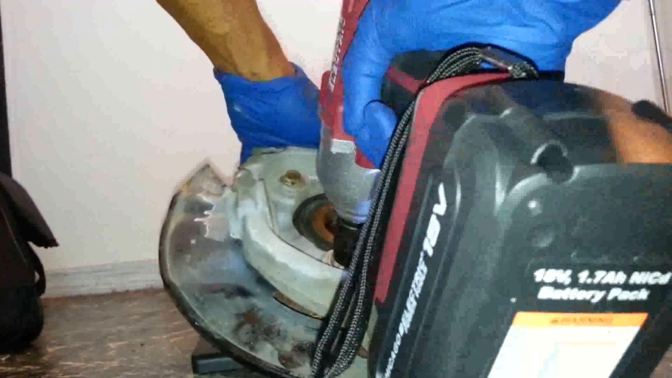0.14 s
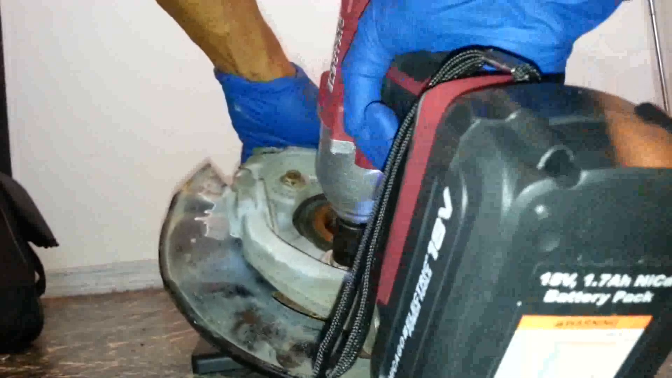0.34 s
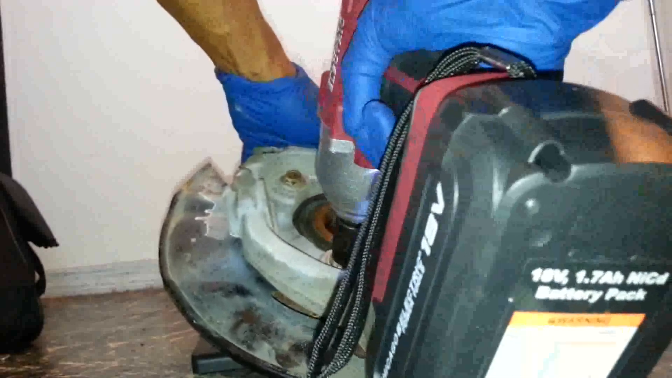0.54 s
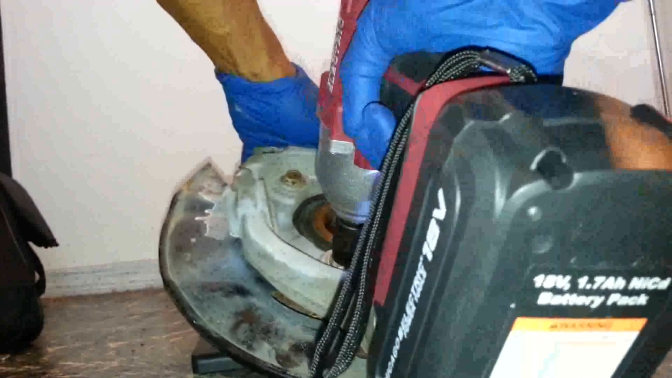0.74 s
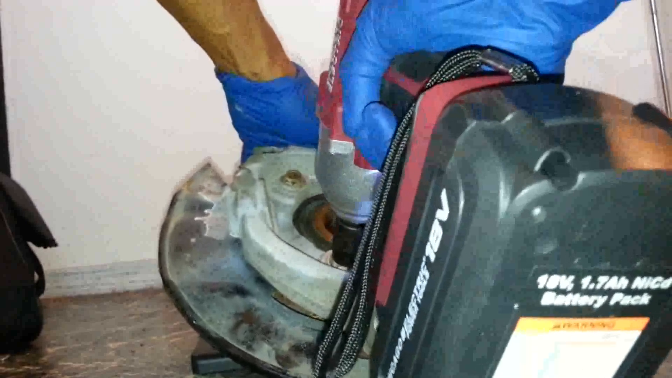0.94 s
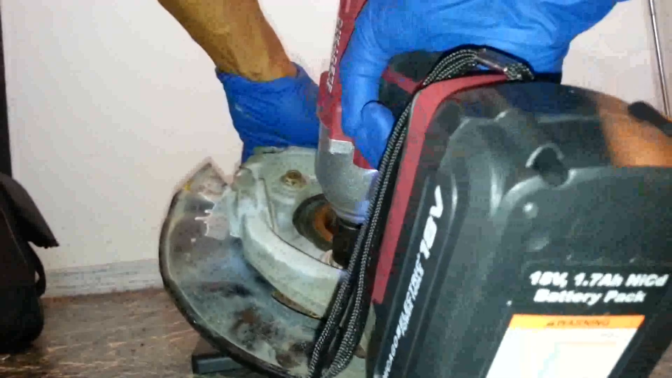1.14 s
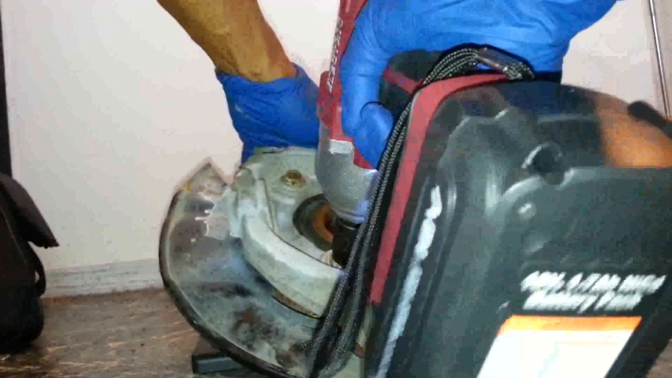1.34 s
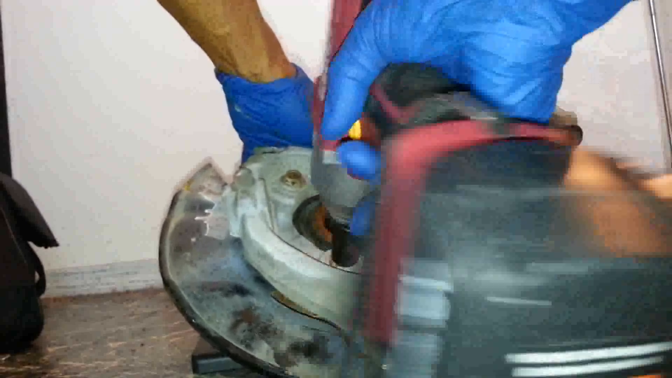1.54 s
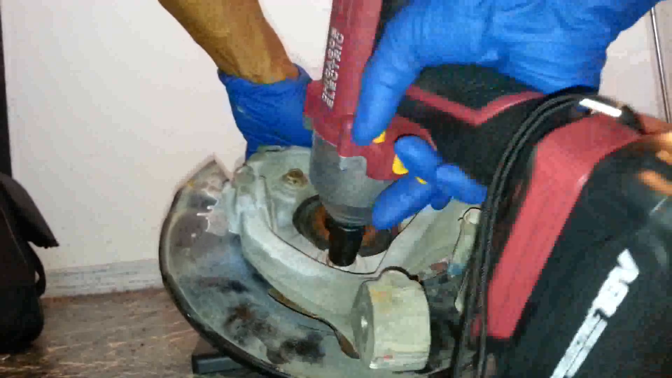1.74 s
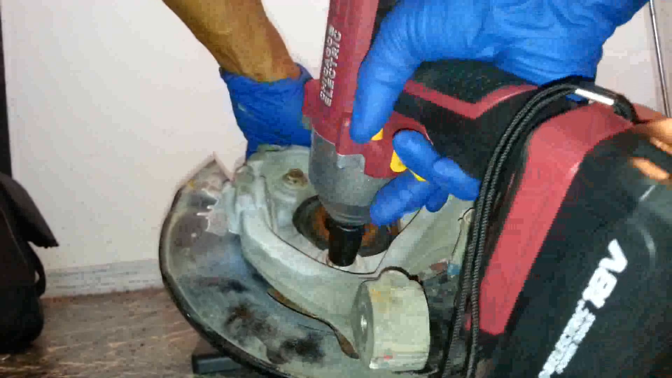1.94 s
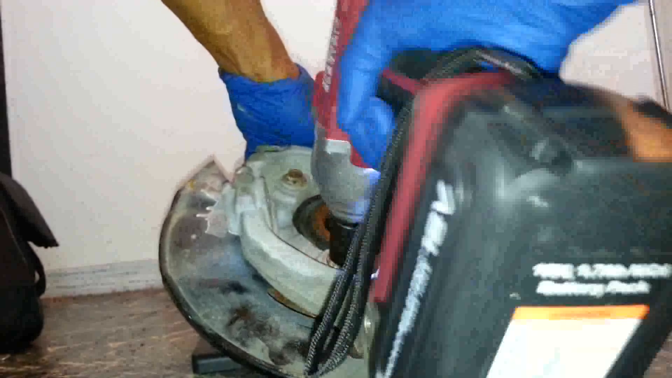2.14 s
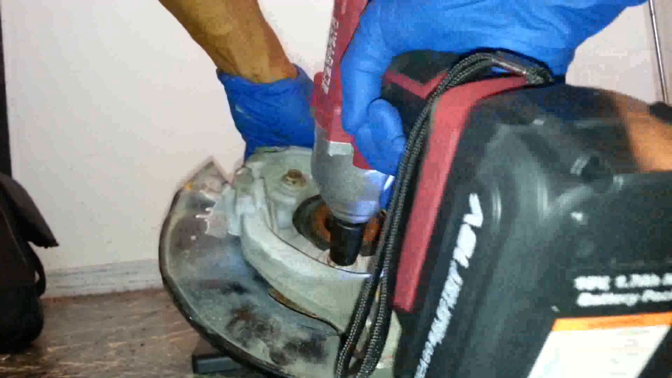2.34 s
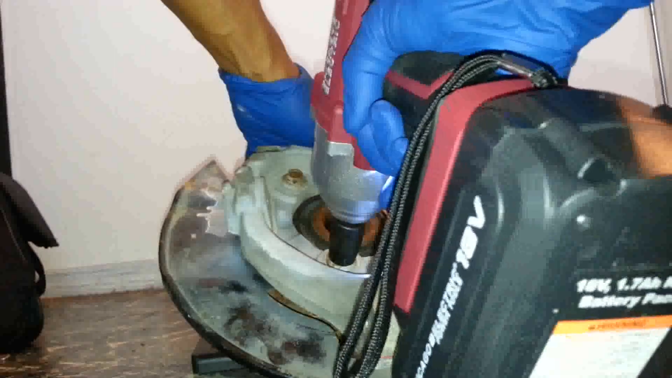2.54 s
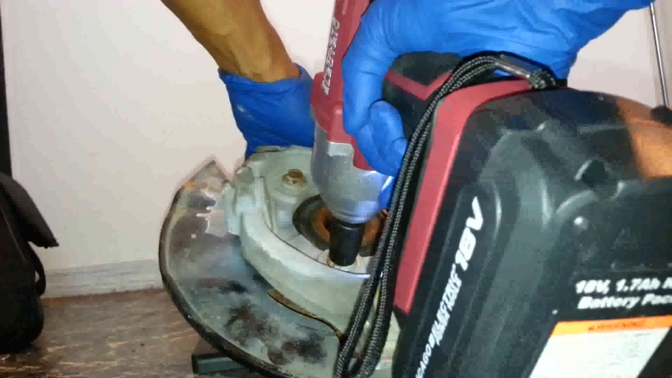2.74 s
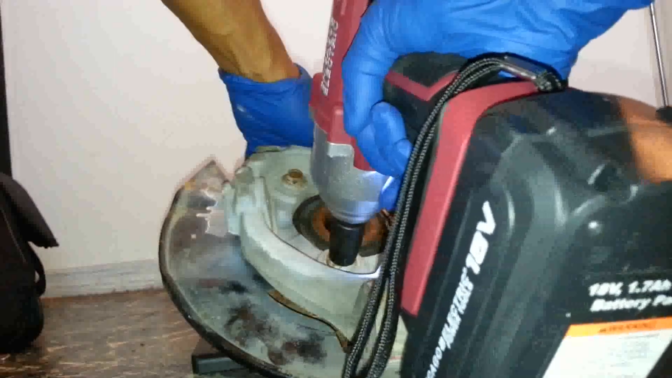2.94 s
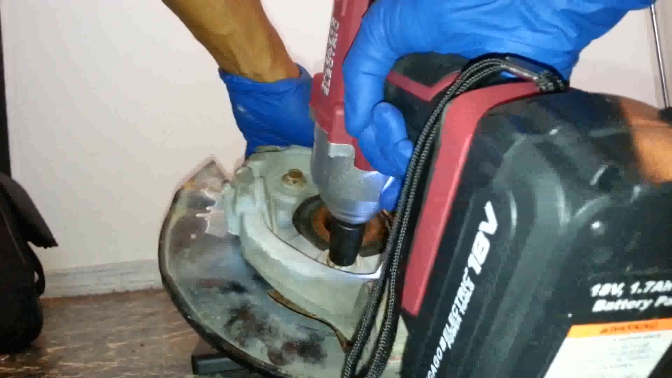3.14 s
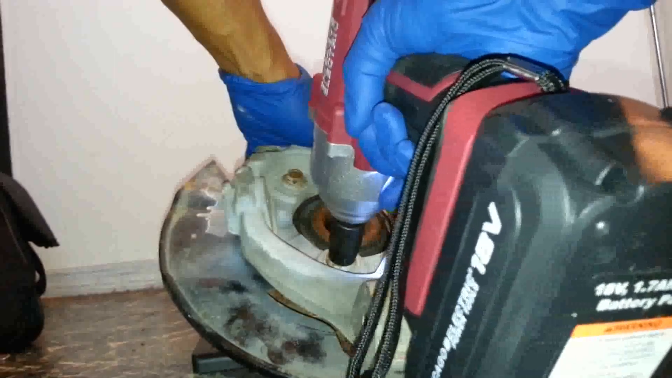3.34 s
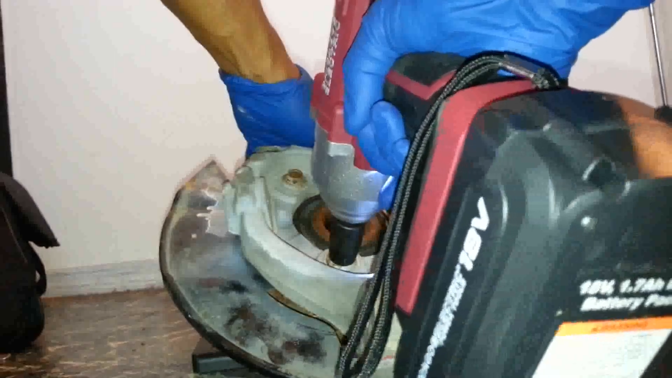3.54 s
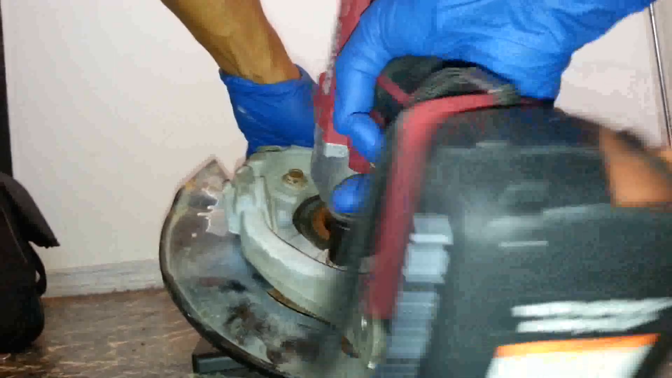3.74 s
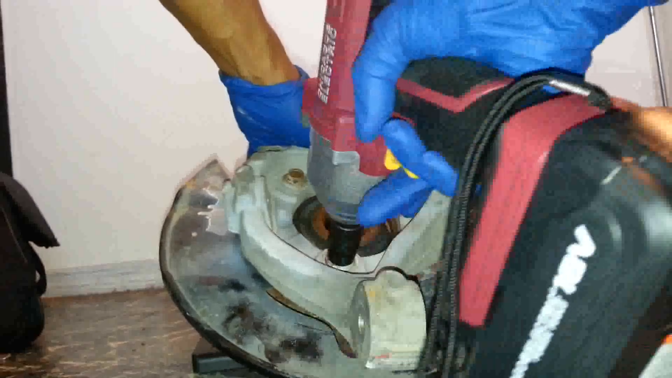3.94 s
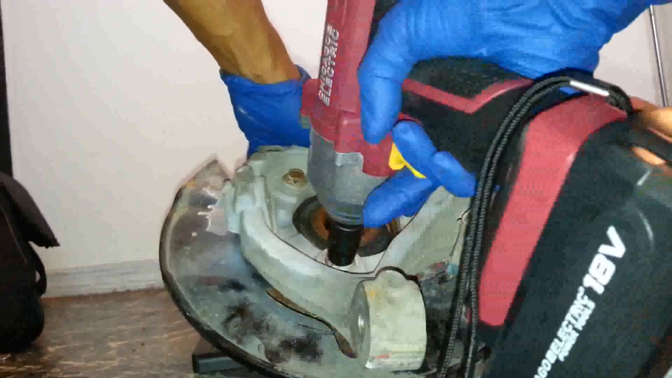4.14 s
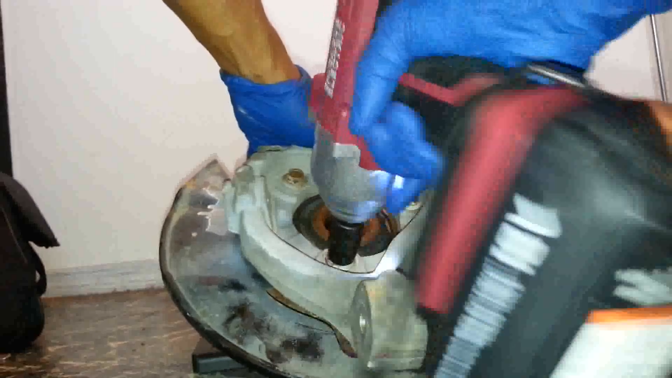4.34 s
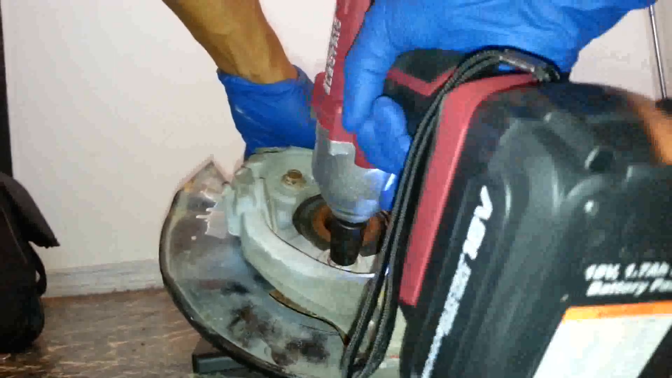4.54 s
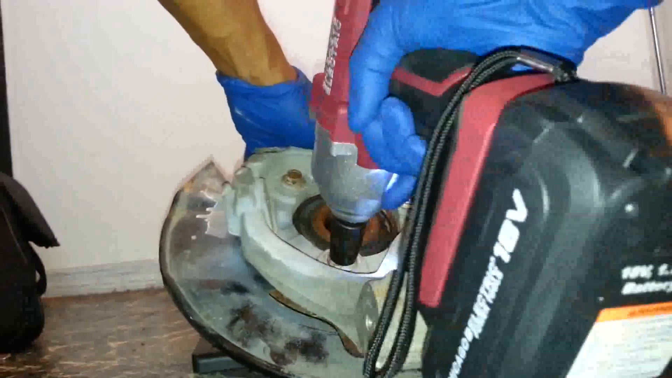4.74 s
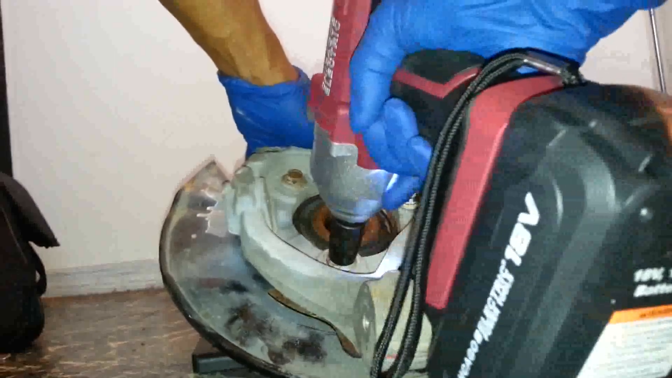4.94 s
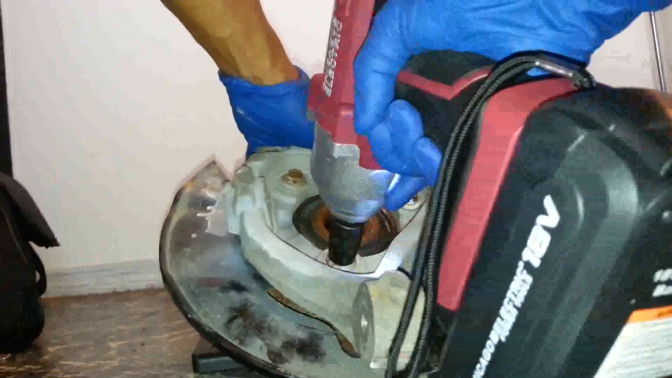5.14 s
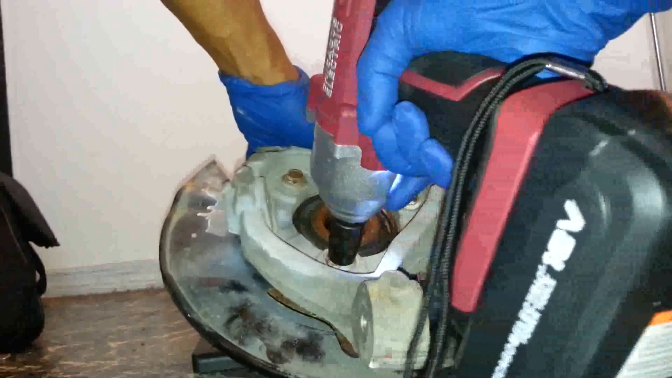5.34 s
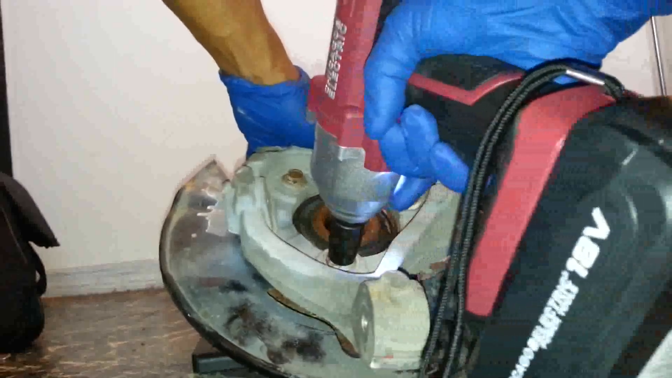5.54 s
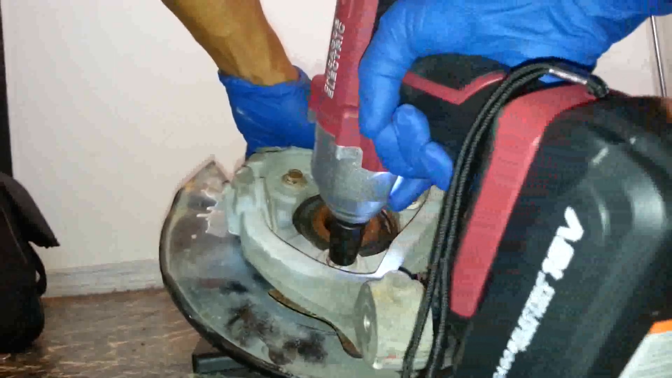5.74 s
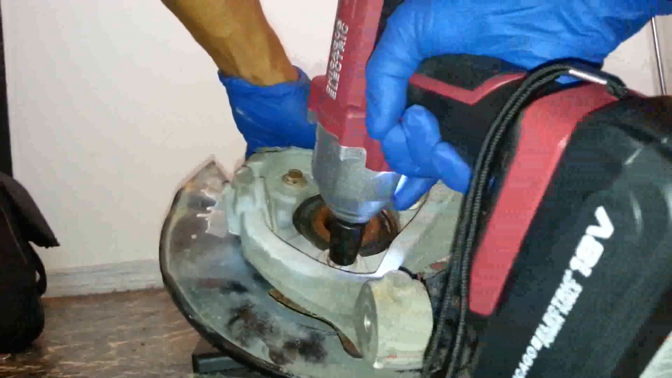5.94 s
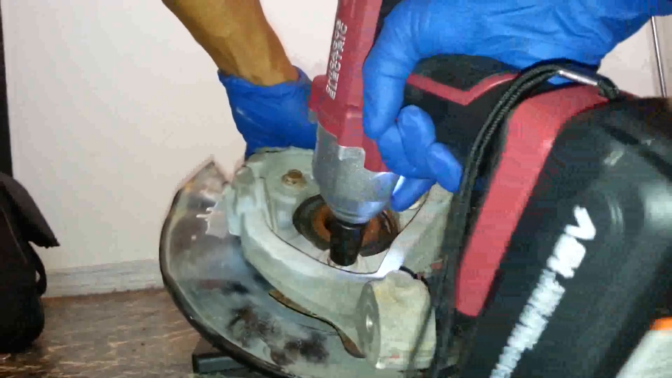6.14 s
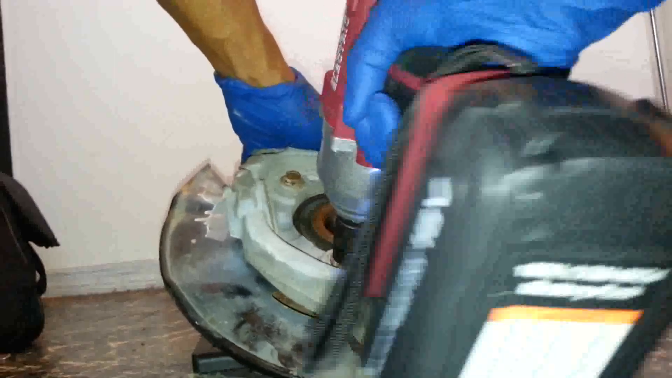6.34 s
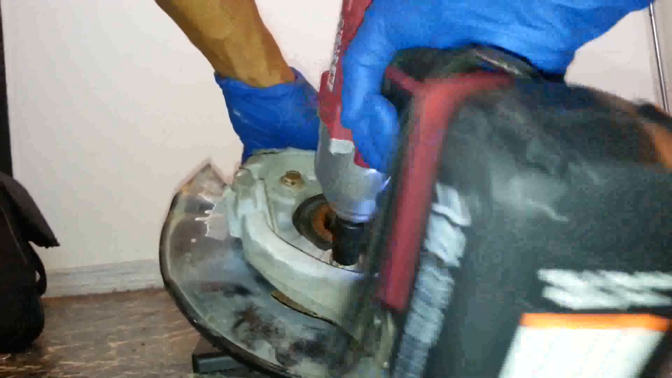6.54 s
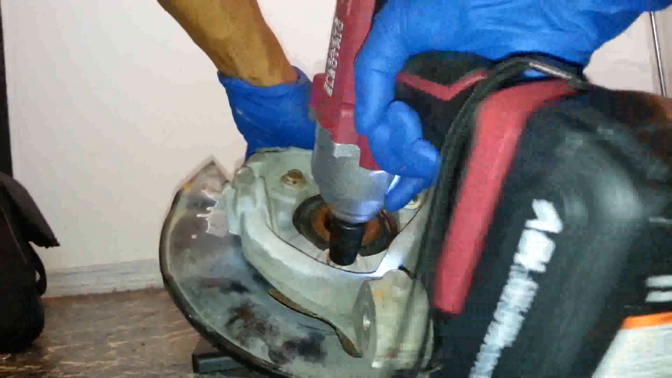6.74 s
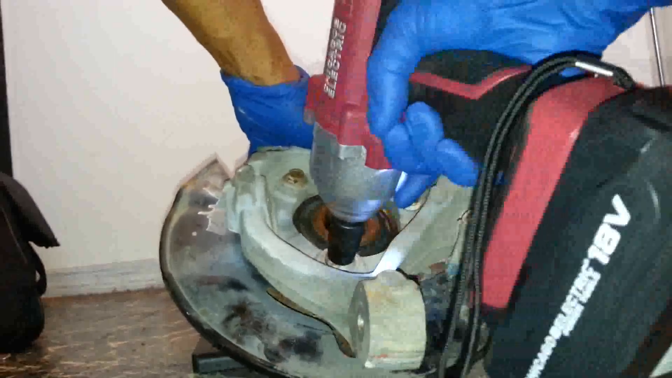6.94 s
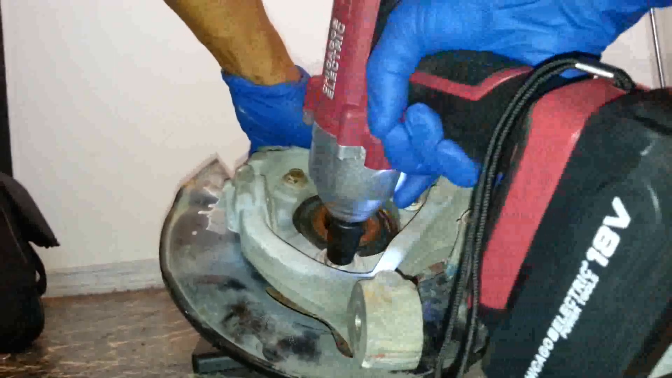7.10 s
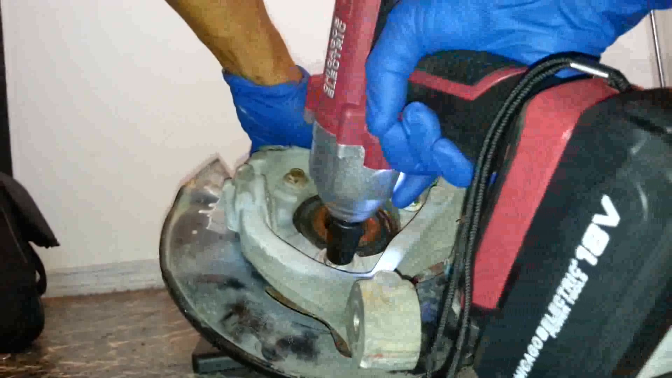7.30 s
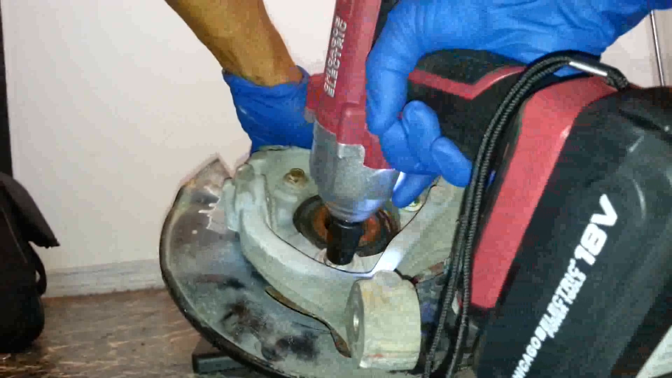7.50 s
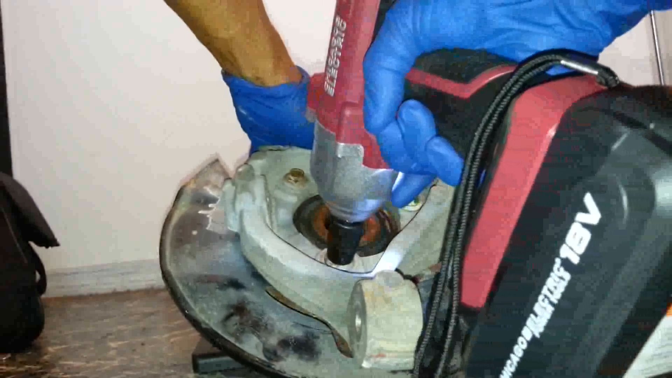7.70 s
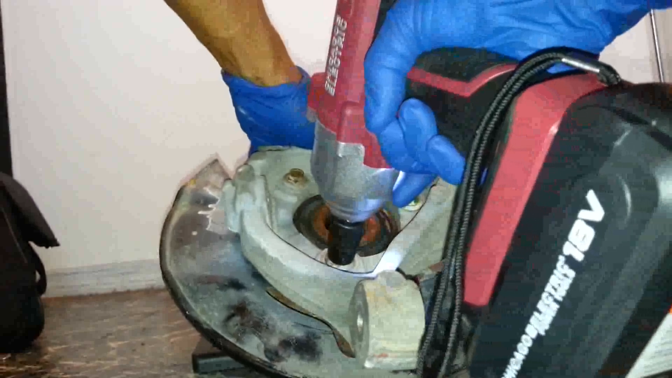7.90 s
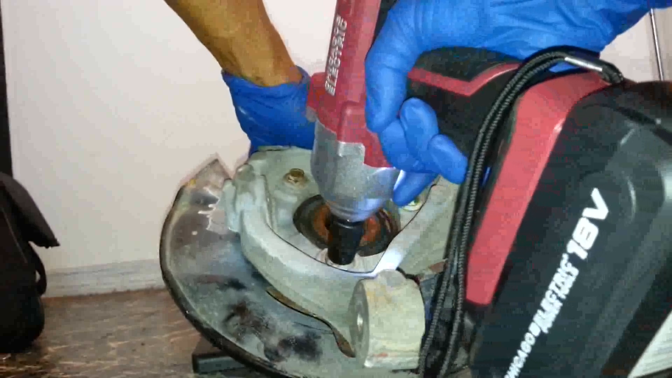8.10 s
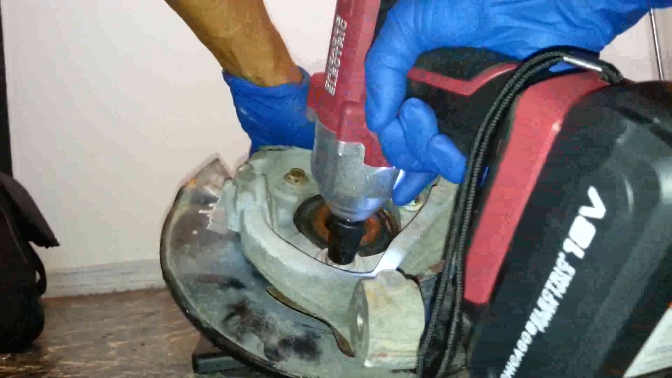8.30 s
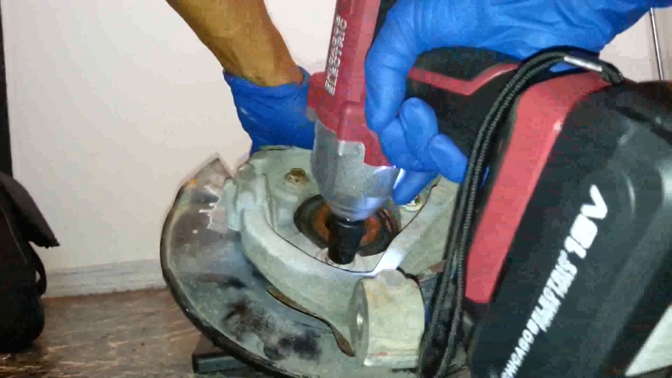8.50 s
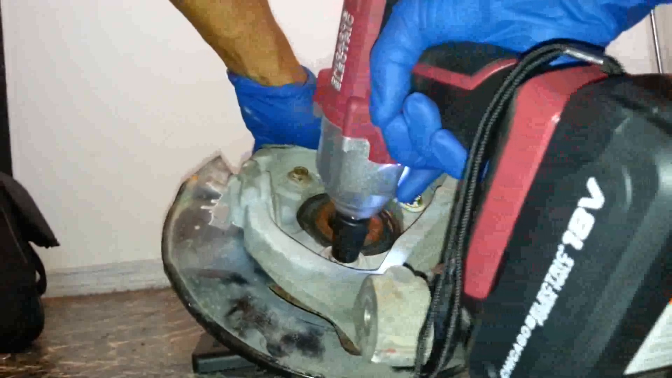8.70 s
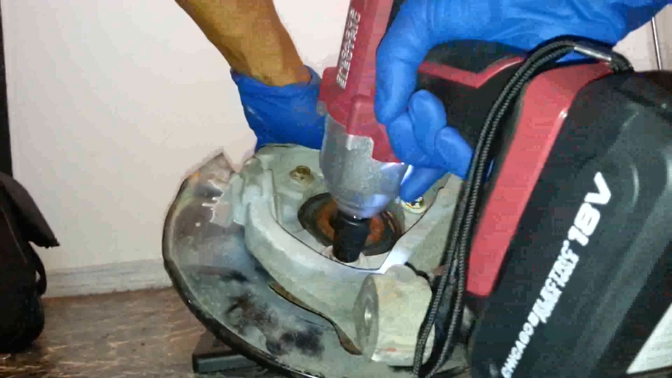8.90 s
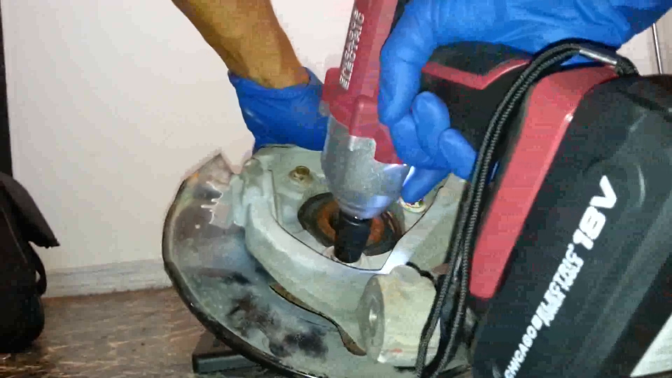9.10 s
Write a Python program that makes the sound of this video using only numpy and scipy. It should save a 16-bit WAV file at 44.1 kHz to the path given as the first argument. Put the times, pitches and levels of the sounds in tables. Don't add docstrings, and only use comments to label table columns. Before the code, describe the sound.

Close up in a hard-walled garage, an impact wrench is already hammering a stuck nut, a rapid ringing clatter of steel. It stops, leaving a short room tail and faint dark hush. A quick motor whir, clicks and a thump lead to a second burst; after another pause, a third hammers on to the end. The overloaded stereo microphones make everything fizzy, flat and loud.

```python
import sys
import numpy as np
from scipy import signal
from scipy.fft import rfft, irfft, next_fast_len
from scipy.io import wavfile
from scipy.ndimage import uniform_filter1d

SR = 44100
rng = np.random.default_rng(int(sys.argv[2]) if len(sys.argv) > 2 else 0)


def gain_from_db(level_db):
    decades = np.asarray(level_db, float) / 20
    return 10 ** decades


def to_wav(s):
    ch = np.atleast_2d(s).T
    pcm = np.round(np.clip(ch, -1, 1) * 32767)
    wavfile.write(sys.argv[1], SR, pcm.astype(np.int16))


N = 408366
TIME = np.arange(N) / SR


def unit(x):
    return x / np.sqrt(np.mean(x ** 2) + 1e-20)


def along(points, hz):
    point_hz, value = np.transpose(points)
    return np.interp(np.log(hz + 1), np.log(point_hz + 1), value)


def filtered(x, response):
    size = next_fast_len(N + SR // 2)
    return irfft(rfft(x, size) * response(np.fft.rfftfreq(size, 1 / SR)), size)[..., :N]


def modes(rows):
    def response(f):
        total = 0
        for k, (hz, width, db) in enumerate(rows):
            total = total + (-1) ** k * gain_from_db(db) * 1j * f * width / (hz * hz - f * f + 1j * f * width)
        return total
    return response


def spikes(times, sizes):
    return np.bincount(np.round(np.asarray(times) * SR).astype(int), sizes, N)[:N]


def dying(x, t60):
    return signal.lfilter([1], [1, -gain_from_db(-60 / (t60 * SR))], x)


def pair(alike):
    left, own = rng.standard_normal((2, N))
    share = np.clip(alike, 0, 1)
    right = share * np.roll(left, shift=-4) + np.sqrt(1 - share ** 2) * own
    return np.array([left, right])


def noise(spectrum, alike):
    return unit(filtered(pair(alike), lambda hz: gain_from_db(along(spectrum, hz))))


# frequency in Hz, level in dB per Hz.
HUSH_SPECTRUM = [(20, 4), (150, 2), (500, -5), (2000, -25), (8000, -29), (16000, -33)]


def hush():
    return gain_from_db(-53.0) * noise(HUSH_SPECTRUM, alike=0.67)


# frequency in Hz, decay time (t60) in seconds.
ROOM_DECAY = [(200, 0.43), (700, 0.35), (1500, 0.43), (3000, 0.41), (5600, 0.43), (8000, 0.46),
              (11000, 0.43), (14000, 0.41)]


def garage(x):
    hz, t, bins = signal.stft(rng.standard_normal((2, SR)), SR, nperseg=256)
    walls = 1 / (1 + (hz / 11500) ** 4)
    decay = gain_from_db(-60 * t / along(ROOM_DECAY, hz)[:, None])
    tail = signal.istft(bins * walls[:, None] * decay, SR, nperseg=256)[1]
    return signal.fftconvolve(x, tail / np.linalg.norm(tail[0]), axes=1)[:, :N]


# frequency in Hz, level in dB per Hz.
FIZZ_SPECTRUM = [(20, -15), (40, -26), (90, 1.5), (300, 3.5), (1000, -1), (3000, -6), (9000, 2.5),
                 (16000, -3)]


def overload(hits):
    swell = dying(hits, t60=0.19) - dying(hits, t60=0.014)
    return unit(swell * noise(FIZZ_SPECTRUM, alike=0.16))


# time in seconds, level in dB.
LURCH_EVENTS = [
    (2.078, -12),
    (4.325, -25),
]
# frequency in Hz, width in Hz, level in dB.
THUMP_MODE = [(74, 32, -1)]


def lurch():
    s, db = np.transpose(LURCH_EVENTS)
    return gain_from_db(64) * filtered(spikes(s, gain_from_db(db)), modes(THUMP_MODE))


# frequency in Hz, width in Hz, level in dB.
KICK_MODES = [(120, 35, -11), (206.5, 30, 2), (245, 13, 6.5), (330, 10, -11.5)]
# time in seconds, level in dB.
TOOL_JERKS = [(1.522, -12), (1.535, -11.5), (1.565, -16), (1.597, -27), (1.642, -30.5), (2.073, -12.5),
              (3.75, -15), (3.768, -11), (3.786, -8.5), (3.815, -24.5), (4.35, -14)]
# frequency in Hz, width in Hz, level in dB.
BENCH_MODES = [(75, 15, -8), (131.7, 8.4, 1.5), (179, 3.4, -4.5), (201, 17, 3), (242, 4.5, -15),
               (318, 20, -4), (366, 3.5, -19), (530, 5.5, -14)]


def bench(hits):
    kick = unit(filtered(hits, modes(KICK_MODES)))
    s, db = np.transpose(TOOL_JERKS)
    jerks = spikes(s, gain_from_db(db))
    shudder = dying(jerks, t60=0.037) * pair(alike=1.0)
    shove = gain_from_db(21) * jerks + shudder
    return gain_from_db(-23.0) * kick + gain_from_db(31.5) * filtered(shove, modes(BENCH_MODES))


# time in seconds, level in dB.
RUN_UPS = [
    [(1.99, -55), (2.02, -41), (2.032, -27.5), (2.08, 9.5)],
    [(4.255, -56), (4.277, -54), (4.305, -2), (4.347, -29.5), (4.35, -15)],
]
# time in seconds, peak in dB.
SLACK_CLICKS = [(2.0142, -27), (2.0237, -21), (2.0314, -38), (2.042, -3), (4.2754, -24), (4.2865, -23),
                (4.3016, -17), (4.315, -6.5)]
# frequency in Hz, level in dB per Hz.
GEAR_SPECTRUM = [(40, -32), (100, -6), (240, -12), (570, -2.5), (1100, -3.5), (2200, -6), (3600, -2),
                 (5600, -2), (7000, -1), (10000, -17), (14400, -38)]


def motor():
    level = sum(gain_from_db(np.interp(TIME, *np.transpose(rows), -120, -120)) for rows in RUN_UPS)
    grit = gain_from_db(2.5 * unit(uniform_filter1d(rng.standard_normal(N), size=90)))
    grind = level * unit(grit) * gain_from_db(-1)
    s, db = np.transpose(SLACK_CLICKS)
    clicks = dying(spikes(s, gain_from_db(db - 7.0)), t60=0.045)
    return (grind + clicks) * noise(GEAR_SPECTRUM, alike=0.89)


# first blow in seconds, number of blows, blows per second at the start.
HAMMER_BURSTS = [
    (.0173, 60, 40.45),
    (2.116, 66, 40.41),
    (4.402, 193, 40.0),
]
# time in seconds, strength in dB.
CATCHES = [(0, 5.5), (2.076, 5.5), (2.091, 5.5), (4.35, 3.5), (4.379, 6.5)]


def blows(scatter_s, scatter_db):
    sag = .155
    bursts = []
    for start, count, rate in HAMMER_BURSTS:
        turns = np.arange(count)
        bursts.append(start + (rate - np.sqrt(rate ** 2 - 2 * sag * turns)) / sag)
    times = np.concatenate(bursts)
    luck = rng.standard_normal((len(times), 2))
    steady = spikes(np.abs(times + scatter_s * luck[:, 0]), gain_from_db(scatter_db * luck[:, 1]))
    catch_s, catch_db = np.transpose(CATCHES)
    return steady + spikes(catch_s, gain_from_db(catch_db))


# frequency in Hz, level in dB per Hz.
CLATTER_SPECTRUM = [(410, -20.5), (700, -16.5), (1400, -13), (2000, -13), (2450, -6), (4060, -6),
                    (4900, -9.5), (6000, -6.5), (7340, -6), (9500, -13.5), (11500, -11.5), (14400, -15)]
# time in seconds, pressure (0 = usual).
SOCKET_PRESSURE = [(0, 1.07), (.6, -0.4), (1.2, 0.8), (1.5, -1.6), (2.1, -.1), (2.9, 0.25), (3.7, 0.062),
                   (4.4, 0.26), (4.9, -.6), (5.5, -0.65), (6.1, -0.27), (6.7, -0.56), (7.1, 0.49),
                   (7.7, 0.07), (8.3, .3), (8.8, 0.24), (9.26, 0.21)]
# frequency in Hz, width in Hz, level in dB.
HUB_MODES = [(875.4, 27, -11.5), (1199, 55, -10.5), (1747, 76, -6.5), (2371, 31, -4), (2557, 52, -8.5),
             (2680, 22, -11), (2948, 29, -8.5), (3082, 30, -5), (3400, 240, -12), (4260, 18, -8.5),
             (4320, 22, -1), (4474, 52, -7), (4600, 38, -5), (4750, 38, -1.5), (4830, 46, 0.6),
             (4917, 71, 0.5), (5077, 49, 1.5), (5485, 21, 1.6), (5610, 81, -0.5), (5944, 92, -8.5),
             (6352, 18.3, 5.5), (6565, 75, -9.5), (6770, 40, -1), (7160, 49, -1.5), (7270, 25, -2),
             (7420, 40, -4), (7960, 50, -4), (8240, 64, -5), (8850, 40, -2), (9290, 95, -9.5)]
# level in dB, change in dB per unit of pressure, change in dB per second as the nut frees.
MODE_FAMILIES = [(-3, -4, 0.28), (-.6, -1, 0), (-4.5, 3, 0.6046), (0.13, 1.5, -0.12)]


def hub(hits):
    chatter = dying(hits, t60=0.085)
    out = gain_from_db(1.5) * unit(chatter * noise(CLATTER_SPECTRUM, alike=0.47))
    force = unit(chatter) * pair(alike=0.44)
    knots = np.linspace(0, N / SR, 56)
    pressure = np.interp(knots, *np.transpose(SOCKET_PRESSURE))
    ring_db = [db + pressed * pressure + freed * knots for db, pressed, freed in MODE_FAMILIES]
    for k, (hz, width, db) in enumerate(HUB_MODES):
        family = np.searchsorted([2000, 4700, 5000], hz)
        rocking_db = 2.86 * rng.standard_normal(len(knots))
        grip = np.interp(TIME, knots, gain_from_db(16 + db + ring_db[family] + rocking_db))
        out += (-1) ** k * signal.lfilter(*signal.iirpeak(hz, hz / width, SR), force * grip)
    return unit(out)


# frequency in Hz, left minus right in dB.
PORT_BALANCE = [(60, -7.5), (140, -2), (300, -1.5), (740, -2.5), (1130, 3.5), (1710, 0.4), (2600, 4.5),
                (3960, 5), (4900, 6.5), (5600, 3.5), (6500, -9.5), (7600, -7.5), (9500, -3), (13900, -2)]


def scene():
    hits = blows(scatter_s=.0008, scatter_db=2.5)
    near = hub(hits) + motor()
    low = bench(hits) + lurch()
    room = garage(gain_from_db(1.5) * near + gain_from_db(-13.5) * low)
    sound = near + low + room + gain_from_db(-2.0) * overload(hits) + hush()
    return filtered(sound, lambda hz: gain_from_db(along(PORT_BALANCE, hz) * [[.5], [-.5]]))


def clipped(x, top_db, hardness):
    return x / (1 + np.abs(x / gain_from_db(top_db)) ** hardness) ** (1 / hardness)


# time in seconds, hold in seconds.
GAIN_SLIPS = [(0.109, 0.02), (0.387, 0.018), (0.536, 0.022), (.792, 0.024), (0.873, 0.027), (0.962, 0.016),
              (1.151, 0.028), (1.454, 0.023), (2.072, 0.0022), (2.087, 0.0094), (2.137, 0.023),
              (3.329, 0.023), (4.675, 0.027), (4.992, 0.025), (5.14, 0.023), (5.974, 0.02), (6.509, 0.024),
              (6.617, 0.021), (6.81, 0.022), (8.022, .019), (8.147, 0.029), (8.318, 0.023), (8.493, 0.021),
              (9.091, 0.022), (9.175, 0.026)]
GAIN_STUMBLES = [5.463, 6.98]
# seconds after its start, jump in dB, hold in seconds.
STUMBLE_WAVERS = [
    (0, 5.1, 0.039),
    (0.066, 4, .018),
    (0.101, 2, .045),
]


def slips(rise_s, fall_s, dip_db):
    jumps = [(s, 6.5, hold) for s, hold in GAIN_SLIPS]
    for s in GAIN_STUMBLES:
        jumps += [(s + after, db, hold) for after, db, hold in STUMBLE_WAVERS]
    gain_db = np.zeros(N)
    for s, db, hold in jumps:
        corners = np.cumsum([0, rise_s, hold, fall_s, .03])
        gain_db += np.interp(TIME - s, corners, [0, db, db - .8, dip_db, 0])
    return gain_db


def roll_off(x):
    return signal.sosfilt(signal.butter(12, 14500, fs=SR, output="sos"), x)


def record(dry):
    x = clipped(dry, top_db=11.5, hardness=8)
    x = filtered(x, lambda hz: 1j * hz / (40 + 1j * hz))
    power = np.abs(uniform_filter1d(np.mean(x ** 2, 0), size=1100))
    level_db = 10 * np.log10(power + 1e-12)
    keep = np.exp(-1 / (0.011 * SR))
    late_db = signal.lfilter([1 - keep], [1, -keep], level_db + 60.5) - 60
    held_db = np.maximum(level_db, late_db)
    squeeze_db = -.85 * np.maximum(held_db + 15.5, 0)
    gate_db = 0.23 * np.minimum(level_db + 42.0, 0)
    slip_db = slips(rise_s=0.0045, fall_s=0.022, dip_db=-1.0)
    x = x * gain_from_db(squeeze_db + gate_db + slip_db + 1.76)
    mix = clipped(x, top_db=-.2, hardness=7)
    return roll_off(mix)


dry = scene()
out = record(dry)
to_wav(out)
```